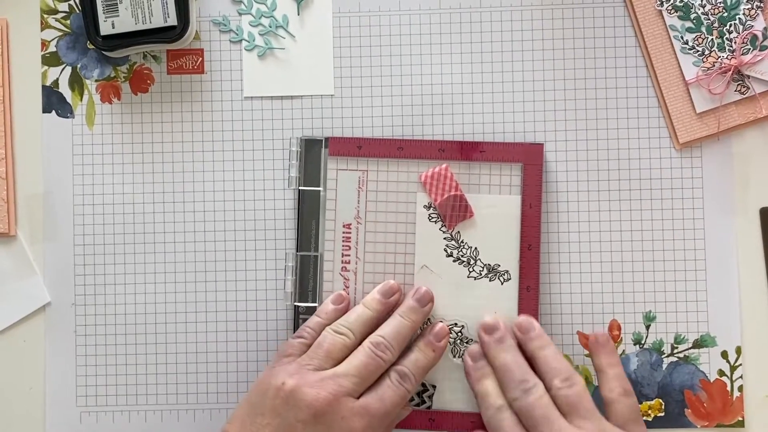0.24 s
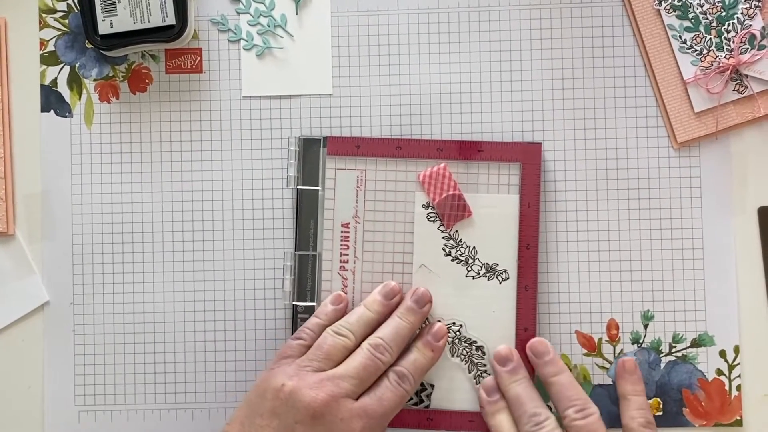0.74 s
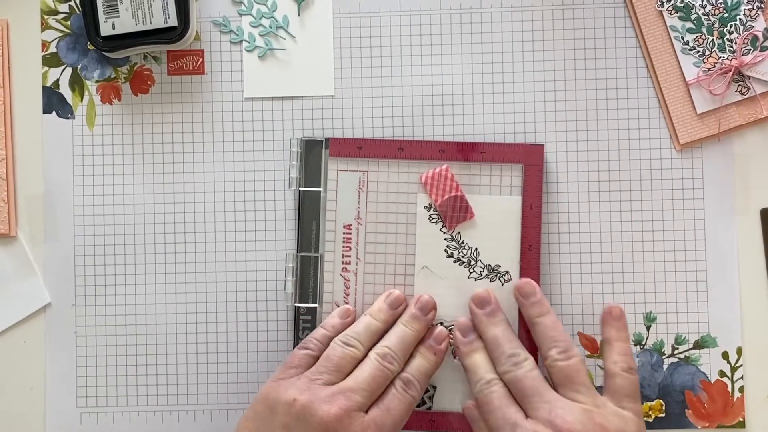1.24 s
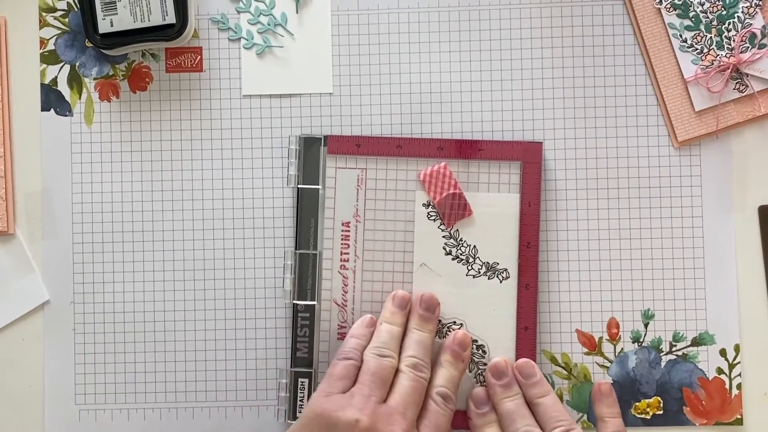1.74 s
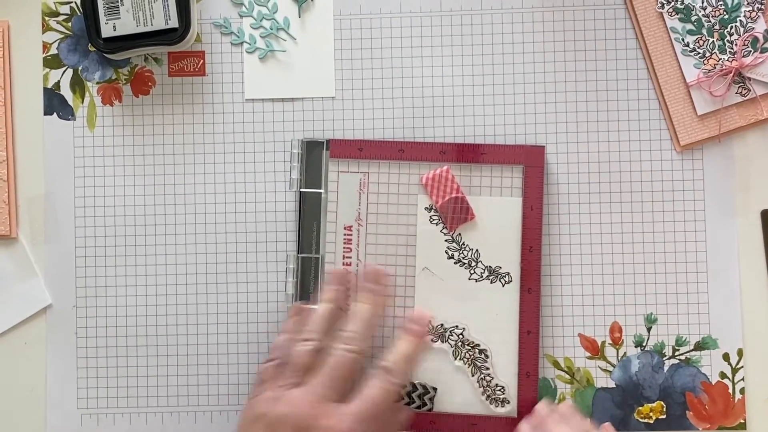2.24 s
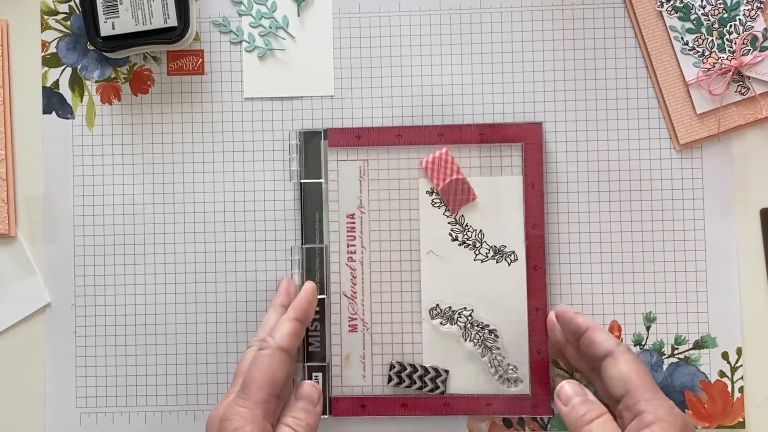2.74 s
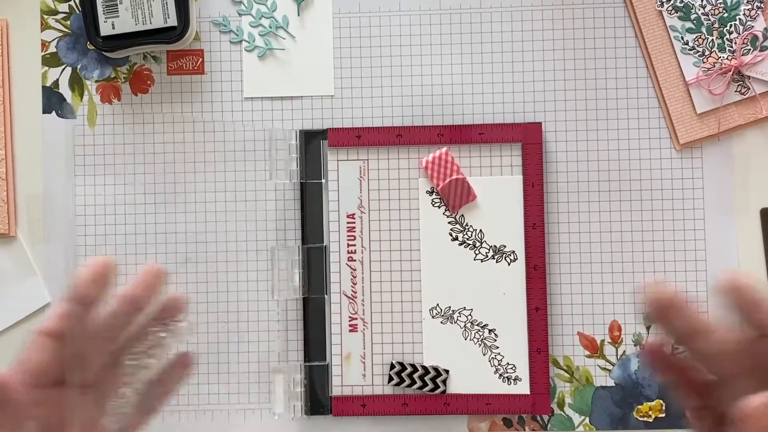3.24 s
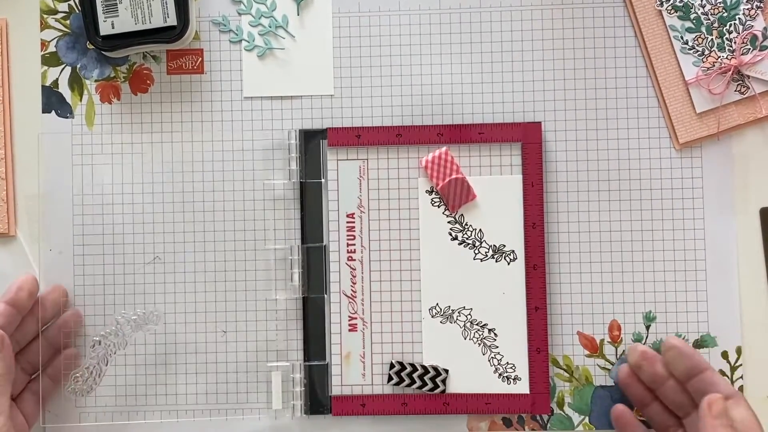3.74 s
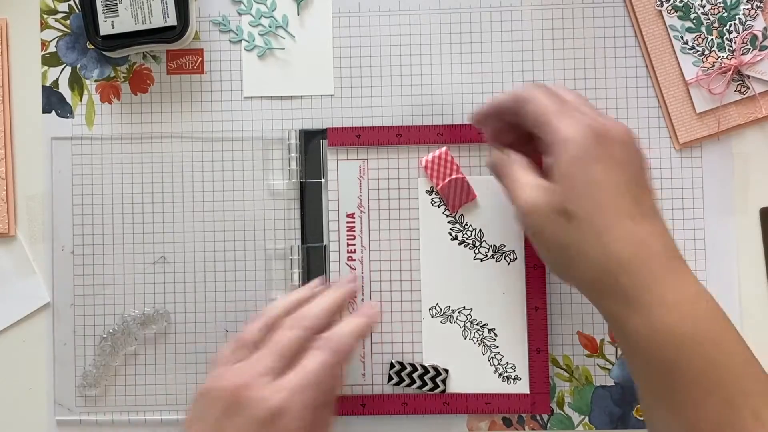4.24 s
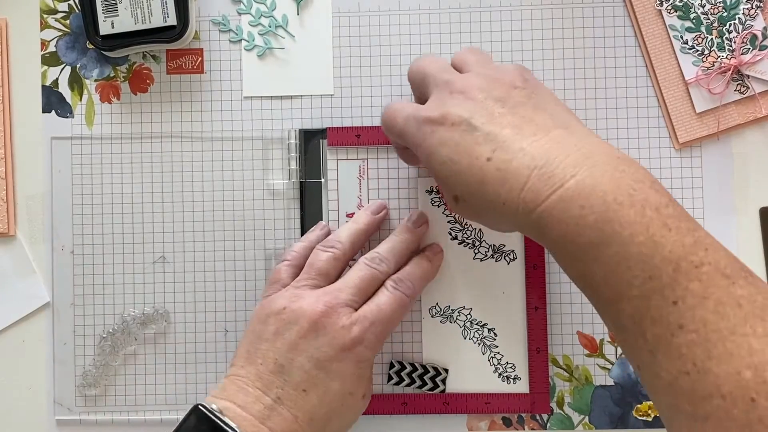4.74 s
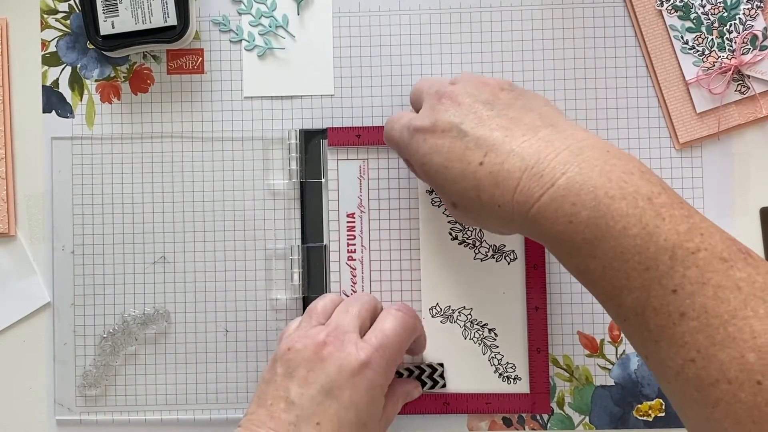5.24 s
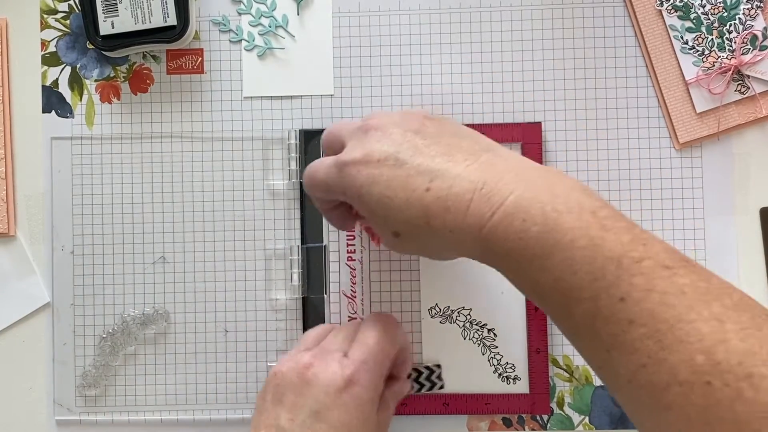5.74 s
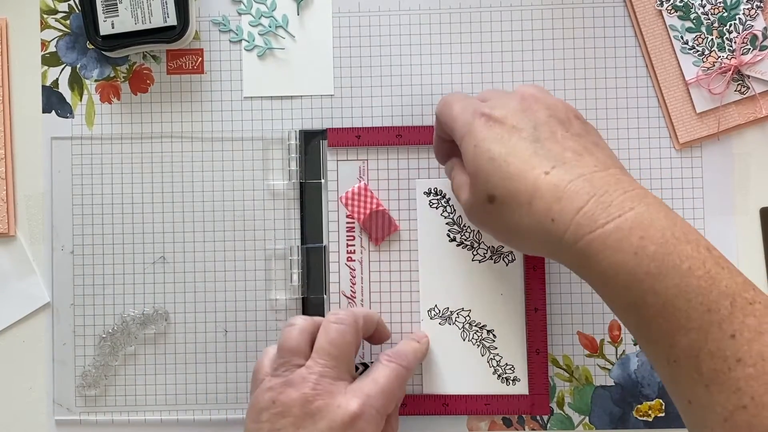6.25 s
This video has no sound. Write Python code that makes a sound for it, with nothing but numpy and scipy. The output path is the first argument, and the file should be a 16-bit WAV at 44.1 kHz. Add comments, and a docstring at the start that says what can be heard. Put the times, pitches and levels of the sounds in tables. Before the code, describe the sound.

A close stereo microphone in a small room with quiet, still air and short reflections. From 0 to 1.5 s, fingers press and rub a plastic door: muffled, irregular low thumps, dry skin rubs and faint clicks over slight table rumble. After a calmer moment, a firmer knock and rub come at 2.1 s, then light hissy strokes. At 2.7 s a stamp tears free in a very short, swelling crackle with tiny ticks. A thin high hinge squeak at 3.1 s leads into a squeal at 3.3 s that drops rapidly into a slowing, ratcheting creak; clacks at 3.8 and 3.9 s end the swing with a soft thud. From 4.2 s hands brush card and tape, with soft thumps and crisp ticks, one sharper at 5.3 s. At 5.67 and 5.74 s a magnet snaps onto steel, two hard bright knocks, the second loudest. Small knocks and paper ticks finish by 6.5 s.

```python
"""Fingers rubbing and pressing a clear plastic door come first, up close, on a hinged stamping tool on a craft table.
The stamp tears off the card in a rising crackle; the door swings on a creaking hinge, made of single slips.
A taped magnet is picked off the card and snaps down on the steel base with two knocks; hands brush the paper.
Blows are short forces exciting modes of table, frame and base; rubbing is coloured grains of noise.
Place: a small room with still air. Distance: close. Microphone: stereo."""
import sys
import numpy as np
from scipy import signal
from scipy.fft import rfft, irfft, next_fast_len
from scipy.io import wavfile
from scipy.ndimage import uniform_filter1d

SR = 44100
rng = np.random.default_rng(int(sys.argv[2]) if len(sys.argv) > 2 else 0)


def transcribe(u):
    """Save the signal u as a 16-bit wav file named by the first command-line argument.

    u: samples, shape (n,) or (channels, n), limited to [-1, 1]; the rate is SR.
    q: integer samples, one column per channel.
    """
    v = np.clip(np.atleast_2d(u).T, -1, 1)
    q = np.round(v * 32767).astype(np.int16)
    wavfile.write(sys.argv[1], SR, q)


N = 286639
TIME = np.arange(N) / SR
HIT_TIME = TIME[:SR // 2]  # time axis of one blow or echo


def amp(db):
    """Decibels to gain."""
    return 10 ** (np.asarray(db) / 20)


def rms_one(x):
    """Scale to rms 1."""
    return x / np.sqrt(np.mean(x ** 2) + 1e-20)


def peak_one(x):
    """Scale to peak 1."""
    return x / (np.abs(x).max() + 1e-20)


def level(rows):
    """Gain over time from a dB curve."""
    return amp(np.interp(TIME, *np.transpose(rows)))


def at_hz(points, hz):
    """Read a table on a log-frequency axis."""
    f, value = np.transpose(points)
    return np.interp(np.log(hz + 1e-9), np.log(f), value)


def colour(x, spectrum):
    """Give a steady sound a spectrum."""
    length = x.shape[-1]
    size = next_fast_len(length)
    gain = amp(at_hz(spectrum, np.fft.rfftfreq(size, 1 / SR)))
    return irfft(rfft(x, size) * gain, size)[..., :length]


def resonance(x, hz, width):
    """Two-pole resonance with gain 1 on top; hz and width in Hz."""
    r = np.exp(-np.pi * width / SR)
    zeros = np.array([1, 0, -1]) * (1 - r * r) / 2
    poles = [1, -2 * r * np.cos(2 * np.pi * hz / SR), r * r]
    return signal.lfilter(zeros, poles, x + 1e-18)


def through(x, response):
    """Pass a sound through an impulse response."""
    return signal.fftconvolve(x, response)[:len(x)]


def add(out, s, sound):
    """Mix a sound in at time s."""
    start = max(0, round(s * SR))
    out[start:start + len(sound)] += sound[:max(0, N - start)]


def gesture(start, length, attack_s, release_s):
    """Envelope of a movement: it gathers speed, holds and comes to rest."""
    age = TIME - start
    return np.clip(np.minimum(age / attack_s, (length - age) / release_s), 0, 1)


def grains(per_s, spread_db):
    """Random tiny slips of uneven size."""
    sizes = amp(spread_db * np.clip(rng.standard_normal(N), -2, 2))
    return (rng.random(N) < per_s / SR) * sizes * rng.standard_normal(N)


def push(hz, cycles):
    """A contact force that swells and dies within a few cycles."""
    age = HIT_TIME * hz / cycles
    swell = age * np.exp(-np.minimum(age, 50))
    return peak_one(swell * np.sin(2 * np.pi * hz * HIT_TIME))


def ringing(modes, scatter_db):
    """Struck modes, with new strengths for each blow."""
    hz, db, t60 = np.transpose(modes)[:, :, None]
    gain = amp(db + scatter_db * rng.standard_normal(db.shape))
    decay = np.exp(-np.log(1000) * HIT_TIME / t60)
    return np.sum(gain * decay * np.cos(2 * np.pi * hz * HIT_TIME), axis=0)


def dense_modes(decay_s):
    """Countless close modes of a plate, heard as quickly dying noise; unit energy."""
    tail = rng.standard_normal(len(HIT_TIME)) * np.exp(-HIT_TIME / decay_s)
    return tail / np.linalg.norm(tail)


def struck(force, modes, direct, dense, decay_s):
    """A body flexes under the force, then rings in a few strong modes and many weak ones."""
    ring = ringing(modes, scatter_db=5.0)
    response = ring / np.linalg.norm(ring) + dense * dense_modes(decay_s)
    return peak_one(direct * force + peak_one(through(force, response)))


def tick(hz, breadth, decay_s):
    """A hard point contact: a sharp crack and a few milliseconds of splinters."""
    return peak_one(resonance(dense_modes(decay_s), hz, hz * breadth))


# how alike left and right are in the diffuse field: f/Hz, likeness/0-1
LIKENESS = [(100, .97), (330, .85), (520, .05), (850, .05), (1200, .55), (2000, .85), (3300, .85),
            (4200, .55), (6000, .45), (13000, .5), (16000, .1)]


def diffuse(size):
    """Stereo noise arriving from all sides, its channels more alike in some bands than in others."""
    mid, side = rfft(rng.standard_normal((2, size)))
    alike = np.clip(at_hz(LIKENESS, np.fft.rfftfreq(size, 1 / SR)), 0, 1)
    shared = np.sqrt((1 + alike) / 2) * mid
    opposed = np.sqrt((1 - alike) / 2) * side * [[1], [-1]]
    return irfft(shared + opposed, size)


# spectrum of the still air at the microphone: f/Hz, relative level/dB
AIR_COLOUR = [(20, 0.5), (50, 7), (120, 16.5), (250, -6), (500, 3), (1000, -5), (2500, -13), (5000, -46),
              (9000, -74), (13000, -57.5), (16000, -71)]


def still_air():
    """Quiet, steady air: diffuse noise, strongest in the bass, under everything at the microphone."""
    noise = diffuse(next_fast_len(N))[:, :N]
    return amp(-76) * rms_one(colour(noise, AIR_COLOUR))


# decay of the room: f/Hz, t60/s
ROOM_T60 = [(100, 0.27), (400, 0.36), (1500, 0.34), (4000, 0.29), (12000, 0.21)]
# colour of its reflections: f/Hz, relative level/dB
ROOM_COLOUR = [(60, -2), (200, 7.5), (450, 7.5), (800, 8.5), (1800, 4), (3000, 5.5), (6000, 2.5),
               (15000, 5)]


def room(x, wet_db, first_s):
    """Diffuse reflections that build up quickly and die away band by band."""
    noise, response = diffuse(len(HIT_TIME)), 0
    edges = np.geomspace(40, 18000, num=10)
    for low, high in zip(edges, edges[1:]):
        hz = np.sqrt(low * high)
        band = signal.sosfilt(signal.butter(2, [low, high], "band", fs=SR, output="sos"), noise)
        decay = np.exp(-np.log(1000) * HIT_TIME / at_hz(ROOM_T60, hz))
        response = response + band * amp(at_hz(ROOM_COLOUR, hz)) * decay
    response = response * (1 - np.exp(-(HIT_TIME / first_s) ** 2))
    return x + amp(wet_db) * np.array([through(x, r / np.linalg.norm(r)) for r in response])


# low rumble of the table under the hands: t/s, level/dB before the trim
RUMBLE = [(0.0, -62), (0.58, -60.5), (1.66, -68), (2.21, -59.5), (2.51, -73.5), (3.31, -68), (3.82, -61),
          (4.07, -71.5), (4.96, -67), (5.16, -59), (5.41, -75.5), (5.61, -70), (5.79, -57), (5.99, -57.5),
          (6.15, -75), (6.5, -78)]
RUMBLE_TRIM_DB = -1.5
# spectrum of that rumble: f/Hz, relative level/dB
RUMBLE_COLOUR = [(20, -16.5), (45, 1.5), (80, 6), (140, 3), (260, 1.5), (400, -10.5), (800, -44)]
# sway of the table as weight is lifted or the door lands: t/s, level/dB from which it falls
SWAYS = [(2.089, -53), (3.934, -53)]
# spectrum of the sway: f/Hz, relative level/dB
SWAY_COLOUR = [(15, -48), (28, -14), (45, 0.5), (80, -5), (130, -10), (250, -45.5)]
SWAY_ATTACK_S, SWAY_FALL_DB_PER_S = 0.0067, 123


def shaking():
    """The weight of the hands makes the table rumble; a sudden change of load sets it swaying."""
    sway = rms_one(colour(rng.standard_normal(N), SWAY_COLOUR))
    rumble = rms_one(colour(rng.standard_normal(N), RUMBLE_COLOUR))
    swing = np.zeros(N)
    for s, db in SWAYS:
        age = TIME - s
        onset = np.clip(age / SWAY_ATTACK_S, 0, 1)
        swing += onset * amp(db - SWAY_FALL_DB_PER_S * np.maximum(age, 0))
    return swing * sway + amp(RUMBLE_TRIM_DB) * level(RUMBLE) * rumble


# strokes of skin over plastic and card: start t/s, length/s, dull rub level/dB, rub centre f/Hz,
# bright hiss level/dB, hiss tilt/(dB per octave)
STROKES = [(0.0, .24, -66, 1410, -75.5, 1), (0.283, 0.19, -70.5, 1350, -76, 3),
           (0.477, 0.52, -75.5, 1390, -103, -6), (0.913, .24, -79, 1230, -100, 2),
           (1.19, 0.26, -75, 1610, -80, 6), (1.388, 0.22, -78.5, 1420, -100, -4),
           (1.903, 0.13, -76.5, 1520, -88, 3), (1.976, .23, -69, 1680, -79.5, -1.5),
           (2.063, 0.038, -50, 1200, -58, 0), (2.287, 0.2, -75.5, 1900, -73.5, .8),
           (2.459, 0.18, -71, 1490, -68.5, -1.9), (2.633, 0.24, -78, 1330, -73, -2),
           (2.912, 0.13, -92, 1526, -78.5, -4.5), (3.157, 0.13, -103, 1300, -76, -3),
           (4.172, 0.37, -84, 1620, -88, -1.5), (4.403, 0.12, -83, 1300, -68.5, 5),
           (4.489, 0.13, -68, 1600, -66.5, 2.5), (4.655, 0.13, -91, 1400, -74.5, 8),
           (4.944, 0.17, -66.5, 1440, -71, -3), (5.115, 0.11, -70.5, 2040, -68, -3),
           (5.219, 0.22, -71.5, 1430, -66.5, 0.5), (5.394, 0.15, -83, 1700, -76.5, .8),
           (5.503, 0.52, -77.5, 1640, -70.5, 0), (5.705, 0.2, -54, 1490, -70, 7),
           (5.868, 0.19, -68, 1610, -83.5, 4), (6.357, .1, -77, 1615, -73.5, -1)]
# spectrum of the dull rub: f/Hz, relative level/dB
RUB_COLOUR = [(300, 4.5), (750, -7), (1100, 3), (1450, -0.5), (1950, -3), (2600, -6.5), (5000, -32.5),
              (9000, -54.5)]
# spectrum of the bright hiss: f/Hz, relative level/dB
HISS_COLOUR = [(1200, -5), (2800, 7), (5000, 5.5), (7500, 3.5), (10000, 3), (13000, -3.5), (16000, -5.5)]
STROKE_ATTACK_S, STROKE_RELEASE_S = 0.034, 0.071
RUB_WIDTH_HZ = 940


def rubbing():
    """Skin slides in countless small slips; each stroke takes its colour from the spot that it rubs."""
    dull = rms_one(colour(grains(per_s=3500, spread_db=3), RUB_COLOUR))
    bright = rms_one(colour(grains(per_s=7000, spread_db=2), HISS_COLOUR))
    out = amp(-98) * dull + amp(-90) * bright  # resting hands are never quite still
    for s, length, dull_db, rub_hz, bright_db, tilt_db in STROKES:
        span = slice(max(0, round(s * SR)), round((s + length) * SR))
        rub = rms_one(resonance(dull[span], rub_hz, RUB_WIDTH_HZ))
        tilt = [(1000, 0), (16000, 4 * tilt_db)]  # four octaves
        hiss = rms_one(colour(bright[span], tilt))
        motion = gesture(s, length, STROKE_ATTACK_S, STROKE_RELEASE_S)[span]
        out[span] += motion * (amp(dull_db) * rub + amp(bright_db) * hiss)
    return out


# fingertips working to and fro, and palms landing: t/s, push level/dB, push f/Hz, knuckle knock level/dB
# (levels before the trims in the function)
PRESSES = [(0.137, -59, 265, -63), (0.321, -49.5, 273, -76), (0.348, -53.5, 109, -73),
           (0.391, -44, 245, -62), (0.472, -44.5, 263, -55.5), (0.519, -53, 135, -68),
           (0.555, -45.5, 268, -63.5), (0.637, -44.5, 266, -56), (0.725, -47.5, 265, -68.5),
           (0.799, -46.5, 277, -69), (0.882, -50, 259, -72), (0.943, -45.5, 269, -63.5),
           (1.046, -52.5, 97, -75), (1.232, -46, 266, -72), (1.315, -44, 248, -67.5),
           (1.378, -46, 273, -70), (1.44, -52.5, 108, -77), (1.839, -56.5, 120, -94),
           (2.17, -53.5, 260, -84), (2.327, -51, 123, -80), (3.217, -48, 140, -82), (3.93, -41, 268, -71),
           (3.943, -47, 154, -71), (4.506, -45, 249, -67.5), (4.863, -53, 263, -88), (4.928, -56, 187, -89),
           (4.968, -53, 238, -69.5), (4.991, -42.5, 245, -64), (5.214, -47, 256, -69),
           (5.587, -49.5, 257, -73.5), (6.095, -46, 160.6, -81)]
# strong modes of table and base: f/Hz, relative level/dB before scatter, t60/s
TABLE_MODES = [(122, -11, .2), (143, -6, .25), (160, -7, .15), (197, -6, .15), (240, -6, .11),
               (270, -4, .12), (315, -7, .09), (363, -3, .22), (427, -7, .18), (490, -14, .12),
               (606, -9, .18), (700, -14, .13)]


def presses():
    """Soft flesh excites the table's low modes; a firmer finger adds a dull knock."""
    out = np.zeros(N)
    for s, db, hz, knock_db in PRESSES:
        flesh = struck(push(hz, cycles=1.0), TABLE_MODES, direct=0.13, dense=0.9, decay_s=0.019)
        knuckle = peak_one(through(push(473, cycles=0.46), dense_modes(decay_s=0.019)))
        add(out, s, amp(db - 1.0) * flesh)
        add(out, s, amp(knock_db + 8) * knuckle)
    return out


# small ticks of nails, tape and card: t/s, peak level/dB before a 5 dB lift, centre f/Hz
TICKS = [(0.509, -69.5, 2630), (2.302, -54.5, 9600), (2.309, -52.5, 9600), (2.668, -61, 8000),
         (2.679, -56, 2650), (2.69, -57, 2750), (2.6995, -45, 2800), (2.7135, -48.5, 2590),
         (3.7622, -44, 5030), (4.441, -43, 7440), (4.505, -52.5, 5440), (4.666, -58, 7200),
         (4.857, -61.5, 5750), (4.869, -53.5, 7400), (5.058, -49.5, 6600), (5.066, -47.5, 6400),
         (5.314, -31.5, 6860), (5.656, -44.5, 4500), (5.7928, -37.5, 6500), (5.8602, -38, 9900),
         (5.8635, -46, 3100), (5.915, -56.5, 3970), (5.968, -55, 2980), (6.308, -42.5, 6040),
         (6.414, -64.5, 2170), (6.479, -60, 2690)]


def ticks():
    """Nails, tape and card edges touch at a point, each a crack of noise around its own pitch."""
    out = np.zeros(N)
    for s, db, hz in TICKS:
        add(out, s, amp(db + 5.0) * tick(hz, breadth=0.37, decay_s=0.0022))
    return out


# spectrum of the tearing ink: f/Hz, relative level/dB
PEEL_COLOUR = [(400, -20), (800, -10), (1150, 1), (1800, -4), (2700, 1), (3800, -6), (6000, -7),
               (10000, -7), (16000, -15)]
# the stamp tears off the card, ever louder until it lets go
PEEL_FREE_S, PEEL_DB, PEEL_RISE_DB_PER_S, PEEL_FALL_DB_PER_S = 2.713, -43.5, 706, 900


def peel():
    """Tacky ink tears away from the card in a short crackle that swells until the stamp is free."""
    crackle = grains(per_s=5000, spread_db=3)
    age = TIME - PEEL_FREE_S
    below_db = np.maximum(-age * PEEL_RISE_DB_PER_S, age * PEEL_FALL_DB_PER_S)
    return amp(PEEL_DB - below_db) * rms_one(colour(crackle, PEEL_COLOUR))


# pushes on the door, during which the hinge sounds: start t/s, length/s, attack/s, level/dB, fade/(dB per s)
HINGE_PUSHES = [(3.065, .07, 0.066, -51.5, 35), (3.14, 0.11, .03, -72.5, 20), (3.271, 0.09, 0.037, -46, -4),
                (3.339, 0.37, 0.02, -42, 16), (3.767, 0.11, 0.0088, -44, 79), (3.848, 0.15, 0.019, -47, 0)]
HINGE_RELEASE_S = 0.018


def hinge_effort():
    """Each push on the door builds up, then eases off; the creak grows with the square of the push."""
    effort = np.zeros(N)
    for s, length, attack_s, db, fade in HINGE_PUSHES:
        fading = amp(db - fade * np.clip(TIME - s, 0, length))
        effort += gesture(s, length, attack_s, HINGE_RELEASE_S) ** 2 * fading
    return effort


# stick-slip in the first squeak: t/s, slips/(1/s)
SQUEAK_RATE = [(3.07, 5980), (3.135, 5580), (3.17, 5850), (3.245, 5480)]
# stick-slip in the long swing: t/s, slips/(1/s)
SWING_RATE = [(3.25, 3170), (3.327, 2850), (3.336, 2530), (3.353, 2250), (3.364, 1440), (3.385, 1030),
              (3.44, 660), (3.47, 240), (3.59, 105), (3.68, 215)]
# stick-slip in the last push: t/s, slips/(1/s)
LAST_PUSH_RATE = [(3.81, 240), (3.835, 130), (3.89, 290)]
# resonances of hinge and door: f/Hz, width/Hz, relative level/dB
HINGE_MODES = [(274, 180, -10.5), (920, 730, -6.5), (1330, 72, 0.5), (2055, 410, -4), (2950, 670, -3.5),
               (4690, 310, 3.5), (5080, 260, 6), (5600, 570, 1.5), (6730, 98, 5), (8300, 970, -10.5),
               (10860, 185, 0.5), (12500, 1100, -6), (15000, 2800, -16)]


def hinge(jitter=0.2, squeal_jitter=0.008, uneven_db=3.0, door_s=0.004, door_share=0.6):
    """Slips come so fast at first that they squeal, then slow to a ratcheting creak."""
    rate = np.interp(TIME, *np.transpose(SQUEAK_RATE + SWING_RATE + LAST_PUSH_RATE), left=0, right=0)
    turns = np.cumsum(rate) / SR
    at = np.interp(np.arange(1, int(turns[-1])), turns, np.arange(N))  # in samples
    gap = np.gradient(at)
    chance = rng.standard_normal((len(at), 2))
    # slow slips are less regular in time and strength than the squeal
    slowness = gap / gap.max()
    at = at + chance[:, 0] * gap * (squeal_jitter + jitter * slowness)
    strength = amp(uneven_db * chance[:, 1] * slowness ** 0.67)
    # windowed-sinc pulses place each slip between samples
    near = at.astype(int)[:, None] + np.arange(-8, 9)
    offset = near - at[:, None]
    pulse = np.sinc(offset) * np.sinc(offset / 9)
    slips = np.bincount(near.ravel(), (pulse * strength[:, None]).ravel(), N)[:N]
    body = np.zeros(N)
    for k, (hz, width, db) in enumerate(HINGE_MODES):
        body += (-1) ** k * amp(db) * resonance(slips, hz, width)
    # bending waves in the door smear each slip into a short chirp: all-pass delays around three pitches
    for hz in (2500, 4300, 4800):
        body = body - 2 * resonance(body, hz, 1200)
    body = body + door_share * through(body, dense_modes(door_s))
    # even out the loudness, so that the push sets the level
    power = np.maximum(uniform_filter1d(body ** 2, size=1600), 0)
    return hinge_effort() * body / np.sqrt(power + 1e-6)


# hard knocks of door and magnet: t/s, clack level/dB, thud level/dB, thud f/Hz, clack f/Hz,
# clack length/cycles before stretching, crack level/dB (levels before the trims in the function)
KNOCKS = [(0.297, -48, -68, 134, 1270, 0.67, -62.5), (0.3589, -57.5, -59, 250, 1140, 0.69, -67),
          (1.216, -48, -79, 263, 1950, 0.89, -53), (1.9224, -49, -63, 202, 1330, 0.12, -67),
          (2.076, -33, -43.5, 206, 1250, 0.58, -40.5), (3.193, -64.5, -76, 200, 1520, 0.17, -58),
          (3.7686, -44, -72, 243, 1385, 1.7, -36.5), (3.8985, -32, -59, 270, 2150, 0.73, -35.5),
          (4.647, -49.5, -51, 242, 1400, 0.36, -55), (5.313, -39, -46, 284, 2030, 0.09, -38.5),
          (5.6696, -19, -30, 235, 1194, 0.55, -31), (5.74, -9.5, -26.5, 330, 1790, 0.39, -23),
          (6.0769, -41.5, -49.5, 250, 1490, 0.47, -41), (6.3027, -45, -62, 437, 1814, 1.7, -44),
          (6.3792, -53, -72, 265, 1620, 2.2, -56.5)]
# modes of the plastic frame: f/Hz, relative level/dB before scatter, t60/s
FRAME_MODES = [(950, -24, .07), (1135, -18, .1), (1290, -17, .1), (1440, -18, .1), (1555, -17, .1),
               (1820, -19, .06), (1930, -20, .05), (2050, -19, .06), (2125, -18, .07), (2300, -22, .04)]
BOARD_HZ, BOARD_DB = 653, -18.5  # the base plate's hollow note, relative to the tabled clack level


def knocks():
    """Each knock cracks at the contact, clacks in frame and base plate and reaches the table a moment later."""
    out = np.zeros(N)
    stiff = signal.butter(2, 110, "high", fs=SR, output="sos")  # the table barely follows in the deep bass
    for s, clack_db, thud_db, thud_hz, clack_hz, cycles, crack_db in KNOCKS:
        frame = struck(push(clack_hz, cycles=0.29), FRAME_MODES, direct=0.1, dense=2.2, decay_s=0.046)
        table = struck(push(thud_hz, cycles=0.37), TABLE_MODES, direct=0.18, dense=2.2, decay_s=0.013)
        board = peak_one(through(push(BOARD_HZ, cycles=0.67), dense_modes(decay_s=0.03)))
        add(out, s - 0.0002, amp(clack_db - 4.0) * push(clack_hz, cycles * 2.3))
        add(out, s + 0.001034, amp(clack_db - 9.5) * frame)
        add(out, s + 0.002, amp(clack_db + BOARD_DB) * board)
        add(out, s + 0.003, amp(thud_db + 7) * signal.sosfilt(stiff, table))
        add(out, s, amp(crack_db + 3) * tick(2300, breadth=0.98, decay_s=0.0023))
    return out


def scene():
    """Everything on the table sounds into the room, over still air."""
    table = shaking() + rubbing() + presses() + ticks() + peel() + hinge() + knocks()
    return still_air() + room(table, wet_db=-8.5, first_s=0.0017)


# phase between the microphone's channels: f/Hz, left lead/rad
PORT_PHASE = [(0, 0), (400, -.15), (1800, 0), (2500, .5), (3300, .03), (4400, .8), (5100, .1), (6000, 1.3),
              (7000, 3.1), (7800, 3.3), (9800, 6.2), (11000, 6.45), (13000, 9.4), (14700, 9.9),
              (15500, 12.2)]
CUTOFF_HZ = 16200 - 300


def record(dry):
    """The stereo microphone's channels differ in phase and a little in level; the top is cut."""
    size = next_fast_len(N + SR // 10)
    hz = np.fft.rfftfreq(size, 1 / SR)
    side = np.array([[1], [-1]]) / 2  # each channel takes half of the difference
    balance_db = at_hz([(80, 1.0), (270, -2.0), (600, -1.0), (1500, 1.2), (8000, -0.1)], hz)
    lead = np.interp(hz, *np.transpose(PORT_PHASE))
    ports = amp(side * balance_db) * np.exp(1j * side * lead)
    sound = irfft(rfft(dry, size) * ports, size)[:, :N]
    return signal.sosfilt(signal.ellip(10, 0.1, 80, CUTOFF_HZ, fs=SR, output="sos"), sound)


dry = scene()
out = record(dry)
transcribe(out)
```